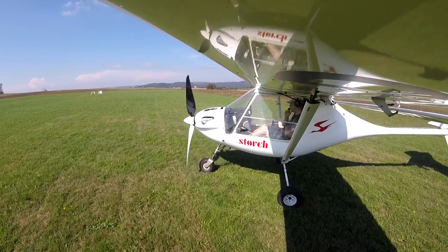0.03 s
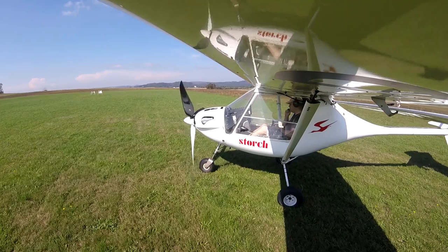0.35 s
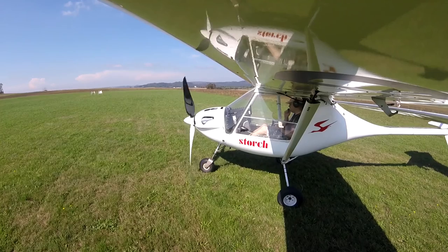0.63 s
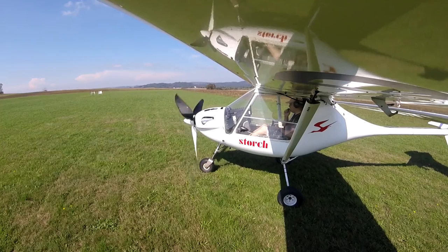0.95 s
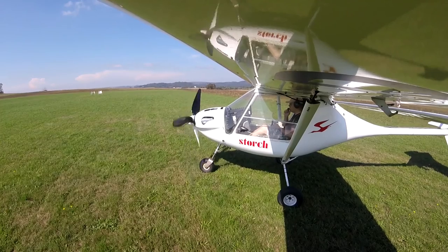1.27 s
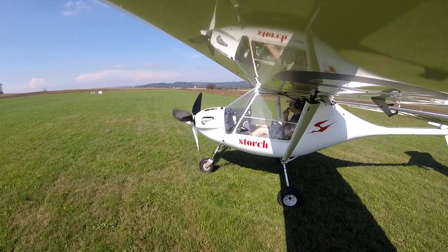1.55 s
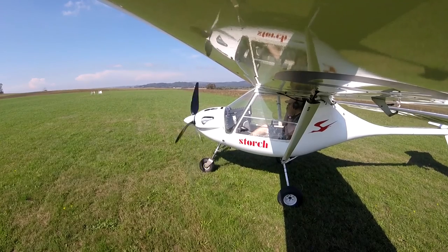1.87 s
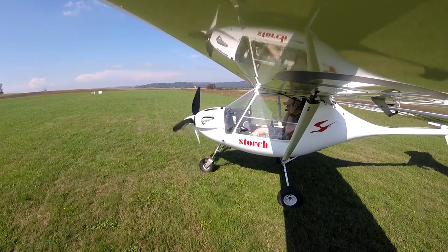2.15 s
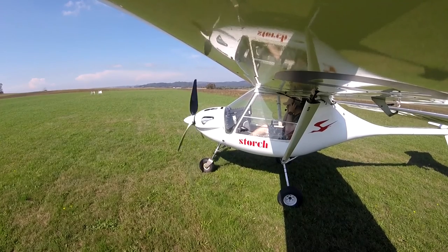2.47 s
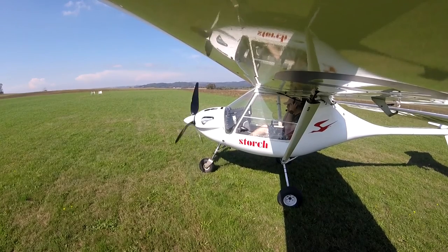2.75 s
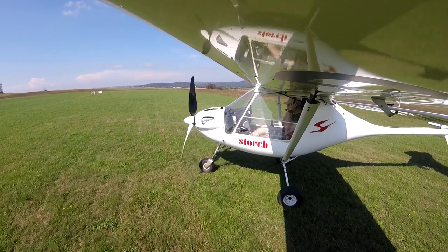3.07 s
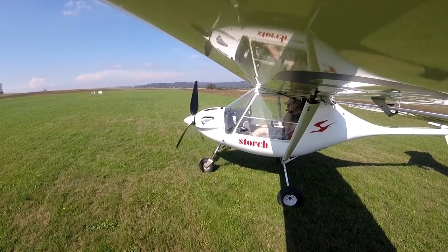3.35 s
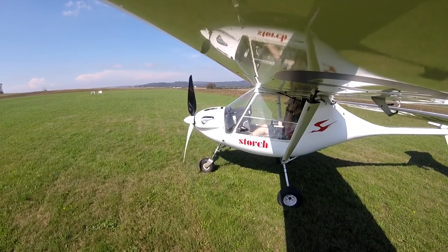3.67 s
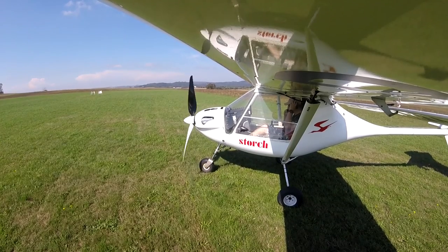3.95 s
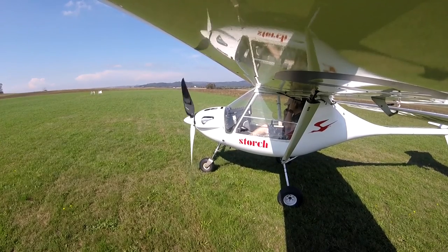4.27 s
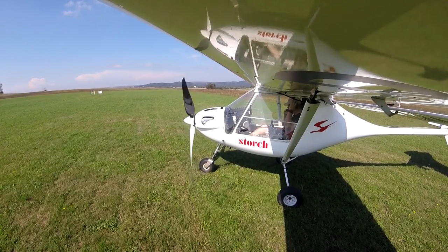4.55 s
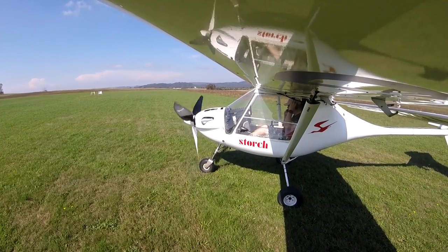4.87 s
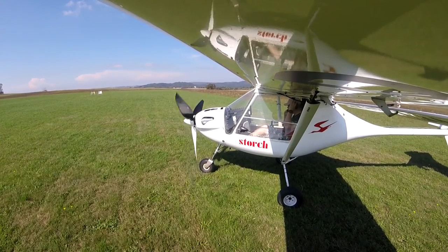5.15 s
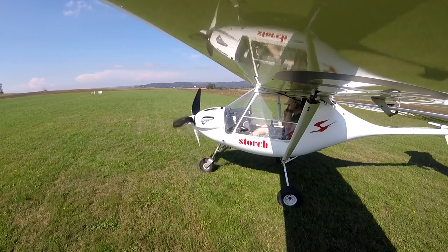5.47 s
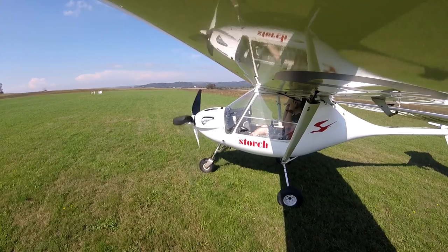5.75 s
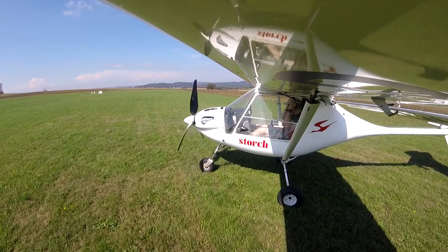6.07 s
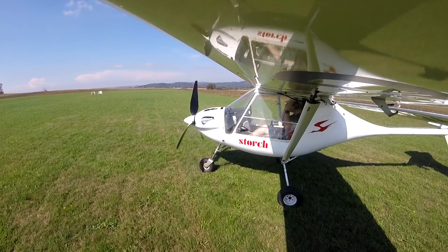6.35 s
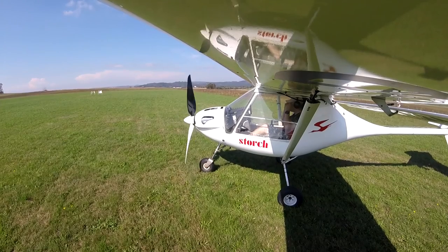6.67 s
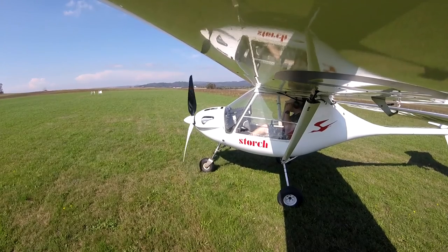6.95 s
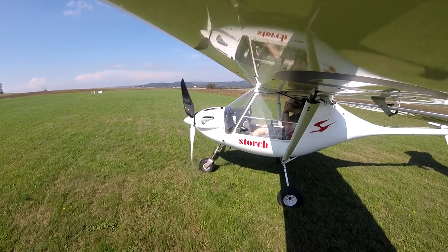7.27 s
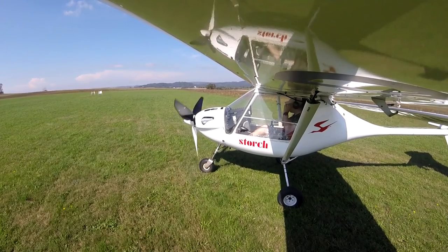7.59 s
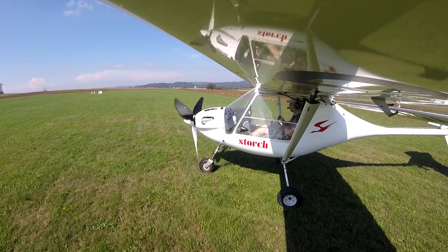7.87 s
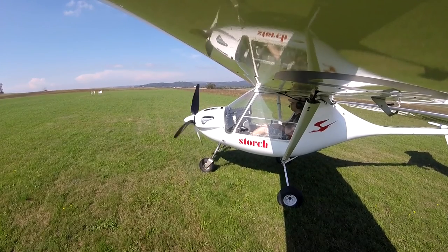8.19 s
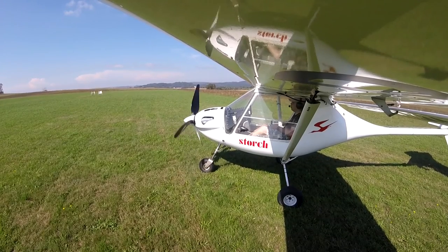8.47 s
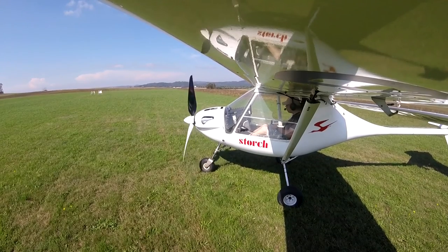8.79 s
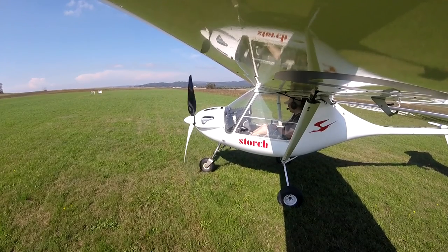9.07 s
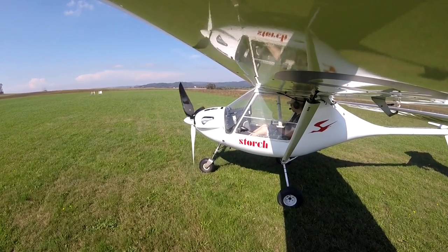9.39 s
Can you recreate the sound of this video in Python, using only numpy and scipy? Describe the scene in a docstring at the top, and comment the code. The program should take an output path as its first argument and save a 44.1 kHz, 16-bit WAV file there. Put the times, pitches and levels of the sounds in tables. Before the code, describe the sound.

A small two-stroke aircraft engine idles for the whole nine and a half seconds, heard close up from under the wing on an open grass field. The main sound is a low, throbbing exhaust drone that holds almost the same pitch and loudness, wavering only slightly. Above it sit a quieter metallic ring from the silencer, breathy exhaust puffs, fast light piston clatter and a fine hiss. The propeller blades add a soft, rapid swish and push air at the microphone, making a low, uneven wind rumble throughout. A deep, fluttering propeller thump comes and goes beneath the engine, swelling most at about 2 to 2.5 seconds, near 7 seconds and again from about 8.7 seconds. The engine is still idling evenly at the end.

```python
"""First comes the low, throbbing boom of an ultralight idling on a grass field, heard from under its wing.
Its two-stroke twin fires twice a crank turn: each firing pulses the exhaust, rings the silencer and
puffs out gas, while the pistons clatter, the casing sings and a fine hiss rides on top.
A reduction gear turns the three-blade propeller, which swishes, thumps and throws gusty air at the
microphone. Every layer plays from start to end."""
import sys
import numpy as np
from scipy import signal
from scipy.fft import rfft, irfft, next_fast_len
from scipy.io import wavfile
from scipy.ndimage import uniform_filter1d

SR = 44100
rng = np.random.default_rng(int(sys.argv[2]) if len(sys.argv) > 2 else 0)


def waveform_to_disk(signal):
    """Save audio, clipped to [-1, 1], as 16-bit WAV at the path in sys.argv[1]."""
    frames = np.transpose(np.atleast_2d(signal))
    scaled = np.clip(frames, -1, 1) * 32767
    samples = np.round(scaled).astype(np.int16)
    wavfile.write(sys.argv[1], SR, samples)


N = 420273

# engine speed, hunting a little about its idle: (time [s], rate [firings/s])
FIRING_RATE = [(0, 85.86), (0.42, 84.55), (0.96, 85.46), (1.27, 84.8), (1.83, 85.14), (2.3, 84.64),
               (2.9, 85.12), (3.32, 84.24), (3.87, 85.66), (4.34, 85.34), (4.8, 85.77), (5.28, 84.75),
               (5.6, 85.43), (7.45, 85.25), (7.75, 85.65), (8.05, 85.39), (9.2, 85.99), (9.53, 85.4)]
# slow swell shared by all engine layers: (time [s], level [dB])
ENGINE_SWELL = [(0, 0.0), (1.65, 0.7), (1.9, 0.04), (3.2, 0.63), (4.1, 0.16), (4.55, -0.7), (5.4, 0.6),
                (6.85, -1.1), (7.3, -0.5), (7.65, 0.2), (7.95, 0.2), (8.3, 0.5), (9.53, -0.9)]
# partials of the exhaust boom: (pitch [multiple of the firing rate], relative level [dB])
EXHAUST_PARTIALS = [(.5, -9.5), (1, 0.5), (1.5, -17), (2, -6.5), (3, -21), (4, -20), (4.5, -29.5), (5, -25),
                    (6, -32.5), (7, -32), (8, -32.5), (8.5, -38), (9, -29)]
# ring of the silencer shell, with fainter gear whine near 1.9 and 2.1 kHz: (frequency [Hz], relative level
# [dB])
SILENCER_EQ = [(760, -30), (850, -10.5), (900, 2.5), (940, 1.5), (981, -11), (1015, 1), (1066, 3),
               (1115, -8), (1190, -34), (1280, -11), (1600, -48), (1920, -12.5), (2130, -19), (2400, -46)]
# breathy body of the exhaust gas: (frequency [Hz], relative level [dB])
GAS_EQ = [(130, -9), (195, -5.5), (243, 7.5), (280, -0.5), (390, 0.5), (460, -1.5), (530, 2.5), (620, -3),
          (760, -2), (980, -5), (1180, -7.5), (1500, -24)]
# midrange bite of the pistons: (frequency [Hz], relative level [dB])
CLATTER_EQ = [(900, -15), (1180, -5.5), (1300, -0.5), (1570, 0), (1770, -6), (1940, -3.5), (2150, -2.5),
              (2300, -14), (2700, -25)]
# bright swish of the blades: (frequency [Hz], relative level [dB])
SWISH_EQ = [(1800, -13.5), (2300, -1.5), (2650, 1.5), (2770, -3), (2850, -0.5), (3100, -2.5), (3330, -7),
            (3620, -7.5), (3930, -4.5), (4030, -13), (4500, -12), (5500, -26)]
# casing and gearbox resonances: (frequency [Hz], width of each filter pass [Hz], level [dB])
CASING_MODES = [(1914, 45, -55), (2730, 240, -62.5), (3417, 52, -62), (3967, 86, -61.5), (4870, 110, -57)]
# engine hiss: (frequency [Hz], relative level [dB])
HISS_EQ = [(2470, -50), (4200, -10.5), (5020, 1.5), (5640, 0), (6160, -6), (6800, -7.5), (8840, -38),
           (15000, -120)]
# sizzle above the hiss: (frequency [Hz], relative level [dB])
SIZZLE_EQ = [(5600, -24), (6700, -2), (7500, 2.5), (9000, 0.5), (9700, -1), (10500, -7), (11100, -11.5),
             (12000, -25), (13000, -45)]
# propeller pressure pulses: (pitch [multiple of the blade rate], relative level [dB])
THUMP_PARTIALS = [(1, -1), (2, -12)]
# strength of the blade thump at the microphone: (time [s], level [dB])
THUMP_FADER = [(0, -44), (0.6, -29), (1.7, -32.0), (2.1, -22), (2.5, -23.0), (3.1, -44.0), (3.4, -29),
               (4, -39.0), (4.3, -27.0), (5, -34), (5.5, -26), (6.1, -33), (6.8, -21.5), (7.55, -36),
               (7.85, -27.0), (8.45, -38.0), (8.75, -25), (9.53, -25.0)]
# rumble of the propeller wash: (frequency [Hz], relative level [dB])
WASH_EQ = [(12, -30), (28, -11), (48, -10.5), (61, 3.5), (73, -9.5), (98, 3.5), (116, 0), (131, -16.5),
           (142, 0.5), (158, -17), (195, -24), (400, -51)]

IDLE_FIRINGS_PER_S, FIRINGS_PER_PROP_TURN, BLADES = 85.3, 8, 3


def from_db(db):
    """Decibels to gain."""
    return 10 ** (np.asarray(db) / 20)


def unit_rms(x):
    """Scale to unit power."""
    return x / np.sqrt(np.mean(x ** 2) + 1e-20)


def automation(points):
    """Straight ramps between (time, value) points, sample by sample."""
    return np.interp(np.arange(N) / SR, *np.transpose(points))


def drift(hz, hop=40, settle=2000):
    """Smooth random wander with a spread of about 1, mostly slower than hz."""
    pole = np.exp(-2 * np.pi * hz * hop / SR)
    noise = rng.standard_normal(N // hop + settle + 2)
    slow = signal.lfilter([1], [1, -2 * pole, pole * pole], noise)[settle:]
    return np.interp(np.arange(N) / hop, np.arange(len(slow)), unit_rms(slow))


def equalise(x, curve):
    """Shape a sound with an EQ curve, silent beyond its ends; unit power out."""
    size = next_fast_len(N)
    hz, db = np.transpose(curve)
    log_hz = np.log(np.arange(size // 2 + 1) * SR / size + 1e-9)
    gain = from_db(np.interp(log_hz, np.log(hz), db, left=-np.inf, right=-np.inf))
    return unit_rms(irfft(rfft(x, size) * gain, size)[:N])


def resonate(x, hz, width):
    """One resonance with gain 1 at its peak."""
    r = np.exp(-np.pi * width / SR)
    feedback = [1, -2 * r * np.cos(2 * np.pi * hz / SR), r * r]
    return signal.lfilter(np.array([1, 0, -1]) * (1 - r * r) / 2, feedback, x)


def throb(cycles, depth_db):
    """A tremolo that swings up and down by depth_db once a cycle."""
    return from_db(depth_db * np.cos(2 * np.pi * cycles))


def rattle(firings, repeat_share, slack, size=1024):
    """Grit that loops every crank turn, early or late by about slack firings, blended with fresh noise."""
    one_turn = rng.standard_normal(size)
    turns = (firings + slack * drift(12)) / 2
    loop = unit_rms(one_turn[(turns * size).astype(int) % size])
    return np.sqrt(repeat_share) * loop + np.sqrt(1 - repeat_share) * rng.standard_normal(N)


def exhaust_boom(firings, rate, surge_db_per_hz=2, pipe_lag=1.559, dispersion=4.72):
    """Low pipe pulses: higher partials leave ever later and smear; the firing tone surges with speed."""
    boom = np.zeros(N)
    for multiple, db in EXHAUST_PARTIALS:
        lag_rad = (multiple - 1) * (pipe_lag + dispersion * max(multiple - 2, 0))
        waver_db = 0.16 * drift(7.7) if multiple in (1, 2) else 0.65 * drift(1.4)
        surge_db = surge_db_per_hz * (rate - IDLE_FIRINGS_PER_S) if multiple == 1 else 0
        boom -= from_db(db + waver_db + surge_db) * np.cos(2 * np.pi * multiple * firings - lag_rad)
    return np.sqrt(2) * boom


def silencer_ring(firings, imbalance=0.11, skew_cycles=.0035, scatter_db=0.36):
    """Every firing knocks the metal shell; one cylinder hits a little harder and earlier than the other."""
    uneven = firings + skew_cycles * np.cos(np.pi * firings)
    hits = np.flatnonzero(np.diff(np.floor(uneven - .08)) > 0)
    accent = 1 + imbalance * np.cos(np.pi * np.round(firings[hits]))
    knocks = np.zeros(N)
    knocks[hits] = accent * from_db(scatter_db * rng.standard_normal(len(hits)))
    return equalise(knocks, SILENCER_EQ)


def gas_rush(firings, late_cycles=0.64):
    """Turbulent gas leaves the pipe in puffs, a little after each firing."""
    return equalise(rng.standard_normal(N) * throb(firings - late_cycles, 1.0), GAS_EQ)


def piston_clatter(firings, blades):
    """Pistons slap unevenly round the crank turn; the clatter also pulses at the blade rate."""
    slaps = throb(2 * firings - .1, -0.2) * throb(firings + 0.34, 3.0) * throb(firings / 2 - .23, 0.6)
    contacts = rattle(firings, repeat_share=0.46, slack=.006)
    flicker = from_db(.5 * drift(110))
    return equalise(contacts * slaps * throb(blades, 2.5) * flicker, CLATTER_EQ)


def blade_swish(firings, blades):
    """Each passing blade swishes, with a lighter pulse at the firing rate."""
    grit = rattle(firings, repeat_share=0.55, slack=.005)
    return equalise(grit * throb(blades + 0.045, 2.0) * throb(firings, 1.0), SWISH_EQ)


def casing_ring(firings):
    """Crankcase and gearbox sing in narrow metallic bands."""
    drive = rng.standard_normal(N) * throb(firings, 0.5)
    return sum(from_db(db) * unit_rms(resonate(resonate(drive, hz, width), hz, width))
               for hz, width, db in CASING_MODES)


def engine_hiss(firings, prop_turns):
    """A puff of hiss with each firing, rippling gently with the propeller."""
    puffs = throb(firings, 1.4) * from_db(0.75 * drift(40))
    ripple = throb(BLADES * prop_turns + 0.12, .7) * throb(prop_turns + 0.12, .5)
    return equalise(rattle(firings, repeat_share=.12, slack=0.0043) * puffs * ripple, HISS_EQ)


def engine_sizzle(firings, prop_turns):
    """The top end flickers, swelling with each firing and once a propeller turn."""
    swell = throb(firings, 1.0) * throb(prop_turns + 0.16, 1.35) * from_db(1.37 * drift(45))
    return equalise(rng.standard_normal(N) * swell, SIZZLE_EQ)


def blade_thump(blades, drone_db=-36.5):
    """Blade pressure pulses: a deep thump that comes and goes under a steady third harmonic."""
    thump = sum(from_db(db + 0.88 * drift(4)) * np.cos(2 * np.pi * multiple * blades)
                for multiple, db in THUMP_PARTIALS)
    drone = from_db(drone_db) * np.cos(2 * np.pi * 3 * blades)
    return np.sqrt(2) * (from_db(automation(THUMP_FADER)) * thump + drone)


def propeller_wash(blades, gust_db):
    """The blades drive a lumpy stream of air across the microphone."""
    wash = equalise(rng.standard_normal(N) * throb(blades, 2.0), WASH_EQ)
    # level it over 1/8 s: the quick lumps stay, and the gusts set its strength
    envelope = np.sqrt(uniform_filter1d(wash ** 2, size=SR // 8))
    return from_db(gust_db) * wash / envelope


def scene(wobble_cycles=.002):
    """The mono mix: one shaft angle drives every layer, and one swell rides the engine's loudness."""
    rate = automation(FIRING_RATE)
    # firings, prop_turns and blades are running counts of cycles
    firings = .65 + np.cumsum(rate) / SR + wobble_cycles * drift(15)
    prop_turns = firings / FIRINGS_PER_PROP_TURN + .09
    blades = BLADES * prop_turns
    engine = (from_db(-18) * exhaust_boom(firings, rate)
              + from_db(-35) * silencer_ring(firings)
              + from_db(-37) * gas_rush(firings)
              + from_db(-42.5) * piston_clatter(firings, blades)
              + from_db(-47) * blade_swish(firings, blades)
              + casing_ring(firings)
              + from_db(-46.63) * engine_hiss(firings, prop_turns)
              + from_db(-52.5) * engine_sizzle(firings, prop_turns))
    gust_db = 2 * drift(hz=2.3)
    air = blade_thump(blades) + from_db(-27.5) * propeller_wash(blades, gust_db)
    return (from_db(automation(ENGINE_SWELL)) * engine + air)[None]


def record(dry, cutoff_hz=12100):
    """A steep low-pass trims the very top."""
    return signal.sosfilt(signal.ellip(10, .1, 80, cutoff_hz, fs=SR, output="sos"), dry)


dry = scene()
out = record(dry)
waveform_to_disk(out)
```